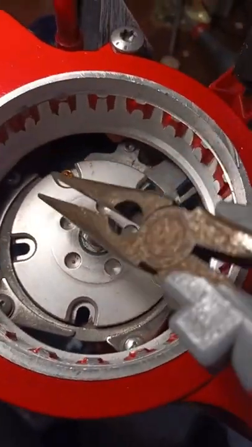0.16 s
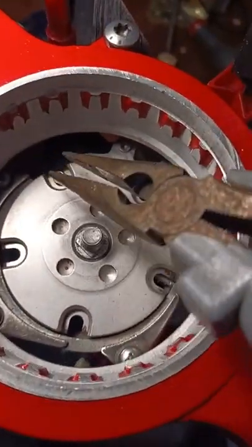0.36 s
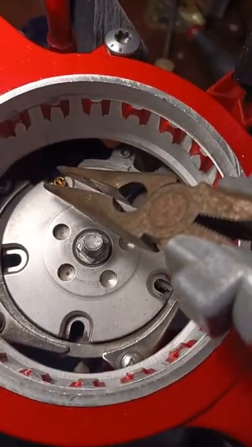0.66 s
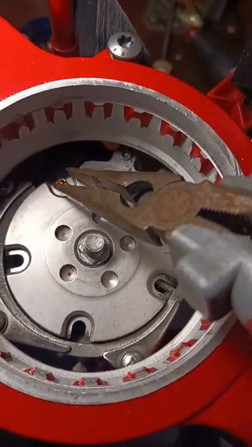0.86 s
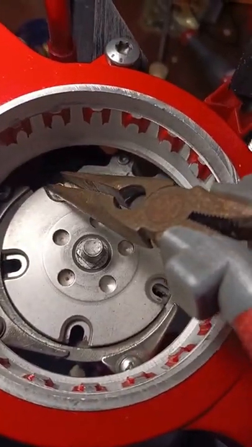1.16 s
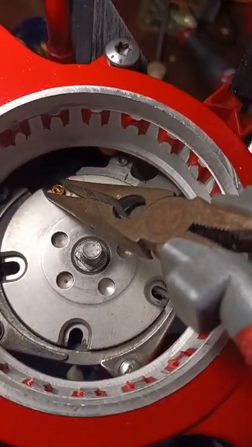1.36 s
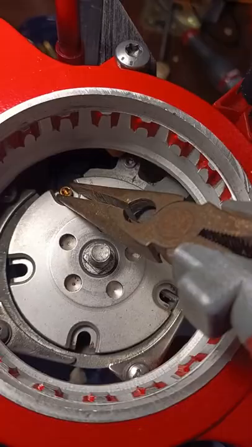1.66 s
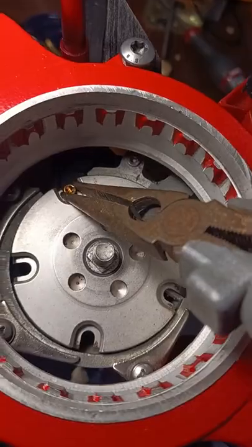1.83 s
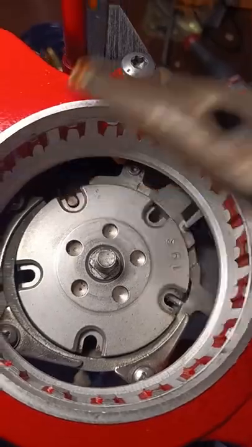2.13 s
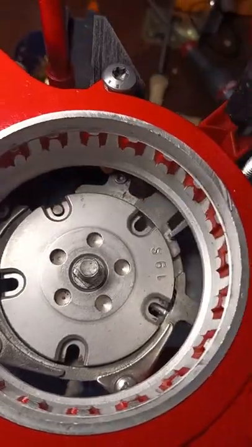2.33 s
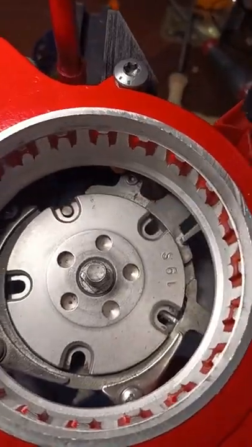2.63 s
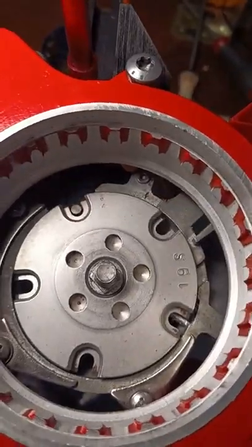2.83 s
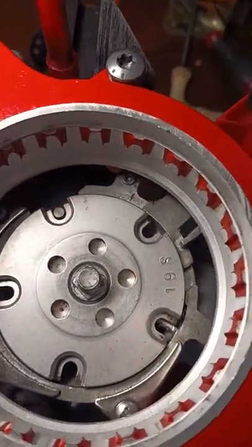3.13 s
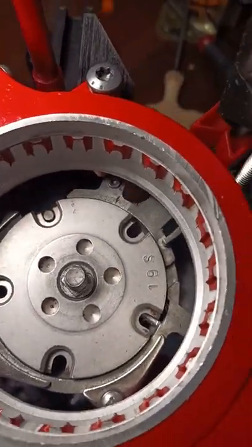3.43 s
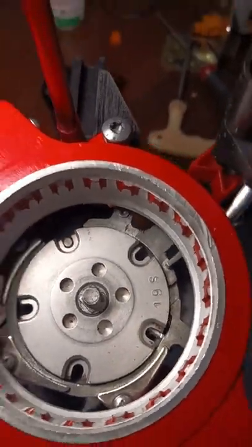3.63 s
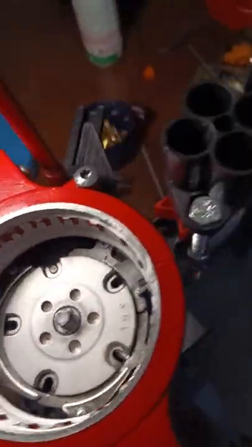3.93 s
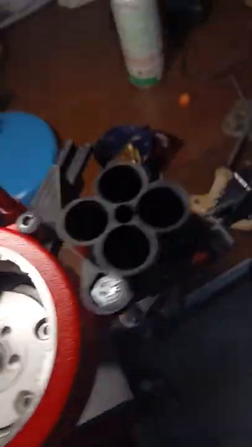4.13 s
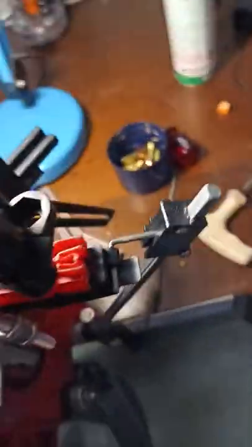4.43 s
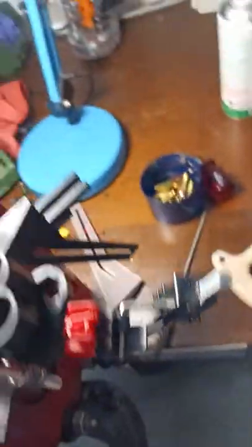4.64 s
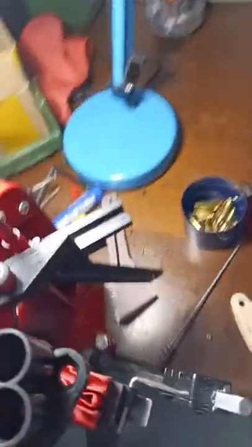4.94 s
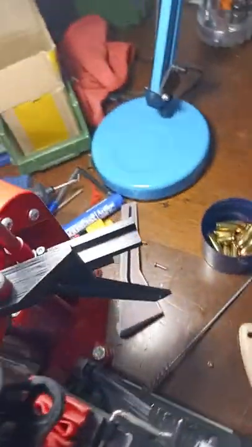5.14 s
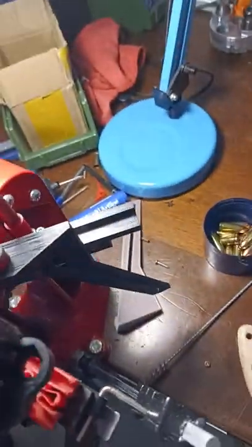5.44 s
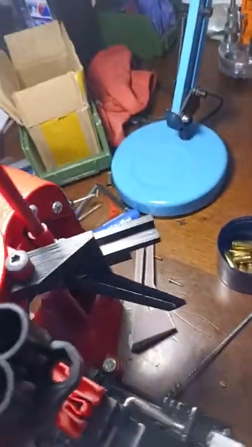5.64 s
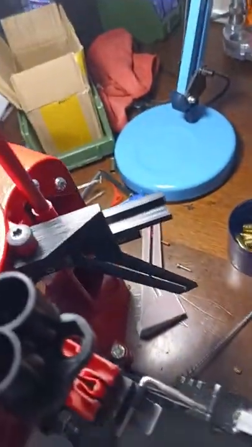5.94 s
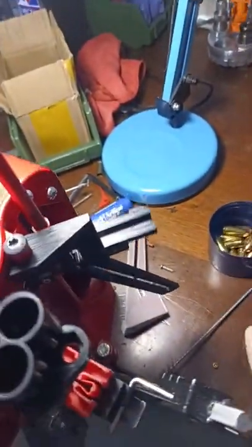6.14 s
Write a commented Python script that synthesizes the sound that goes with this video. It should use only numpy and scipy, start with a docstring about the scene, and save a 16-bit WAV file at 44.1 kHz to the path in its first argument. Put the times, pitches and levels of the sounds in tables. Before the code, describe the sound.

A quiet workshop with a faint low hush, heard close by a hand-held stereo microphone in a short, diffuse room. From 0.2 to 0.8 s plier tips graze metal in tiny, uneven ticks, mostly left, over barely audible cloth; sparse ticks continue. At 1.54 s a sharp, dry click knocks the metal plate, with a weaker one at 1.82 s. From 2.3 to 2.8 s a sleeve rubs softly and dull bumps nudge the microphone. A small clack and bright tick come at 3.06 s, crisp ticks at 3.7-3.85 s. Grainy cloth rustle swells around 4.1-4.6 s, then thins to a light sheen. A faint thud at 5.5 s precedes the loudest event at 5.83-5.89 s: a double clank with ringing steel and deep bench thud, rattling away until about 6.0 s. A spring catch chatters rapidly at 6.04 s, with duller clunks at 6.08 and 6.26 s.

```python
"""In a workshop, pliers tick and knock on the shell plate of a reloading press, close to a hand-held camera.
A sleeve brushes past as the arm withdraws and the camera swings round. Then the press is worked:
the bench thuds, the steel linkage clanks and rattles, and a spring catch chatters.
Solid parts are struck modes (decaying sines) and dense modes (decaying coloured noise);
cloth is grainy noise shaped by stroke speed and pressure, and a short diffuse room answers the impacts."""
import sys
import numpy as np
from scipy import signal
from scipy.fft import rfft, irfft, next_fast_len
from scipy.io import wavfile
from scipy.ndimage import uniform_filter1d, map_coordinates

SR = 44100
rng = np.random.default_rng(int(sys.argv[2]) if len(sys.argv) > 2 else 0)


def put_to_file(sound):
    """Save the sound as 16-bit audio at rate SR, in the file named by the first command-line argument."""
    columns = np.atleast_2d(sound).T  # one column per channel
    safe = np.clip(columns, -1, 1)
    whole_steps = np.round(safe * 32767)
    wavfile.write(sys.argv[1], SR, whole_steps.astype(np.int16))


N = 276948
AGE = np.arange(SR * 3 // 5) / SR  # time since a strike [s]

# All levels are relative; pan is left minus right.
# Blows in the press: (time [s], level [dB], clack re level [dB], steel re level [dB],
# share of the free ring time [0-1], most excited frame pitch [Hz])
PRESS_BLOWS = [(3.057, -37, -0.5, -29, 0.4, 680), (5.494, -49, -4, -27, 0.58, 780),
               (5.834, -24, -12.5, -19, 0.31, 700), (5.886, -18.5, -8.5, 2, 0.38, 690),
               (6.075, -28, -14, -27, 0.69, 780), (6.257, -28.5, -6, -24, 0.94, 760)]
# Modes of the cast frame ringing freely: (frequency [Hz], level [dB], t60 [s])
FRAME_MODES = [(550, -38.5, .2), (703.6, 2, 0.65), (763.5, 4, 0.43), (751, -8, 0.95), (926, -22.5, 0.13),
               (966.4, -10, 0.45)]
# Dense low modes of the frame: (frequency [Hz], density [dB per Hz])
CLUNK_SPECTRUM = [(150, 6), (320, -0.5), (480, -2.5), (670, 14), (950, 0), (1150, -9), (2000, -43)]
# Loose parts knocking together: (frequency [Hz], density [dB per Hz])
CLACK_SPECTRUM = [(200, -37), (390, 12), (550, -26), (860, 15.5), (1150, -3.5), (1530, 3.5), (1720, 6),
                  (1900, -6), (2150, 0.5), (2400, 2), (2900, -21), (4000, -46)]
# Modes of the steel linkage without joint friction: (frequency [Hz], level [dB], t60 [s])
LINKAGE_MODES = [(3155, -17, .22), (3391, -13, 0.33), (3830, -3, 0.39), (3830, -3, .4), (3805, -17.5, .35),
                 (3935, 30, 0.73), (3990, -17, .25), (4936, -14, .25), (5464, -54, .35), (5740, 26, 0.74),
                 (6400, 15, 0.83), (5923, -30, .35), (6700, -3, .2), (5850, 26, 0.096), (7122, -22, .3)]
# Dense upper modes of the linkage: (frequency [Hz], density [dB per Hz])
CLANG_SPECTRUM = [(2400, -18), (3100, -6), (3500, 6.5), (3950, 0), (4300, -7.5), (5200, -12.5), (5800, 3),
                  (6300, -3), (6800, -14), (7400, -9), (8300, -20), (9500, -87)]
# Runs of the spring catch: (time [s], slips [count], first gap [s], level [dB])
CATCH_RUNS_TABLE = [(5.843, 2, 0.018, -20), (6.038, 7, 0.009, -19.5)]
# One slip of the catch: (frequency [Hz], density [dB per Hz])
CATCH_SPECTRUM = [(1180, -20), (2000, -17), (3520, -11.5), (3910, -62), (4260, -5.5), (5350, -23),
                  (5730, 3), (6590, 3.5), (7380, 2), (8330, -20.5), (11100, -26.5), (12400, -44),
                  (16000, -18)]
# The bench takes the load: (time [s], level [dB])
BENCH_THUDS = [(5.381, -44), (5.495, -33.5), (5.848, -18.5), (5.939, -24.5), (6.015, -46)]
# Modes of the bench top: (frequency [Hz], level [dB], t60 [s])
BENCH_MODES = [(70, -34, 0.055), (92.8, 2, 0.29), (110.8, -8.5, 0.46), (157.5, -13, 0.35),
               (215.7, -14, 0.28), (306, -29, 0.13)]
# Things jostled on the bench: (frequency [Hz], density [dB per Hz])
JOSTLE_SPECTRUM = [(35, -14), (80, 8.5), (200, 4), (330, -4), (600, -19), (1500, -52)]
# Pliers strike the shell plate: (time [s], level [dB], knock re level [dB], click t60 [s],
# click pan [dB], strike point across the plate [0-1])
PLIER_KNOCKS = [(1.5404, -21.5, -14.5, 0.02, -4.5, 0.17), (1.6207, -41.5, -2, 0.021, 6, 0.14),
                (1.8177, -49.5, -1, 0.022, 2, 0.27), (1.823, -26, -15.5, 0.041, 2.5, 0.27),
                (1.8642, -41.5, -14.5, 0.033, 10, 0.1), (2.0138, -62, 1.5, 0.028, -7, 0.19)]
# Modes of the shell plate before the strike point weakens them: (frequency [Hz], level [dB], t60 [s])
PLATE_MODES = [(332, -7.5, 0.066), (432, -23, 0.072), (525, 1, 0.065), (674, 1.5, 0.049), (753, -1, 0.05),
               (860, -28, 0.092), (1750, -9.5, 0.029), (2036, -16, 0.053), (2970, -14.5, 0.042),
               (3530, -25, 0.039), (6370, -20.5, 0.17)]
# Click of the jaws: (frequency [Hz], density [dB per Hz])
CLICK_SPECTRUM = [(300, -19), (900, -27), (1200, -14), (1700, -6.5), (2400, -9.5), (3000, -6.5), (3700, -2),
                  (4600, -13), (6000, -0.5), (7500, -7), (9000, -24), (12000, -36), (16000, -19.5)]
# Distinct touches of plier tips and small parts: (time [s], level [dB], pitch [Hz], pan [dB])
TIP_TICKS = [(0.313, -44.5, 2980, -8.5), (0.47, -45.5, 2950, -5), (0.6785, -38.5, 6430, -11.5),
             (0.918, -40, 7160, -7), (1.1843, -44, 7500, -2), (1.3938, -41.5, 6900, -3),
             (1.7958, -48.5, 6200, -13), (2.016, -52, 2190, 7), (2.2854, -45, 6500, 9),
             (3.057, -28.5, 6230, 6), (3.7114, -27, 6970, -10), (3.732, -24.5, 2270, -5),
             (3.8466, -27.5, 5990, -1)]
# Strokes of cloth: (time at full speed [s], rise [s], hold [s], fall [s], level [dB],
# pressure [0-1], pan [dB])
CLOTH_STROKES = [(-0.01, 0.19, 0.29, 0.61, -60.5, 0.67, -6.5), (0.71, 0.15, 1, 0.85, -70.5, 0.64, -4.5),
                 (2.287, 0.2, 0.19, 0.2, -57, 1, -11), (2.512, 0.32, 0.22, 0.15, -47.5, 0.87, -11),
                 (2.969, 0.32, 0.1, 0.13, -49, 0.02, -10), (3.328, 0.43, 0.38, 0.096, -58.5, 0.02, -5.5),
                 (3.742, 0.096, 0.057, 0.057, -45.5, 0.95, -9.5),
                 (4.153, 0.24, 0.2, 0.28, -40.5, 0.93, -9.5), (4.406, 0.13, 0.098, 0.21, -37.5, 0.78, -8.5),
                 (4.714, 0.29, 0.56, 0.17, -47.5, 0.18, -3), (5.47, 0.31, 0.067, 0.19, -57.5, 0.3, -2.5),
                 (5.72, 0.14, 0.19, 0.9, -53.5, 0.42, -9), (6.16, 0.86, 0.26, 0.2, -58, 0.9, -3)]
# Sleeve dragging on the press: (frequency [Hz], density [dB per Hz])
DRAG_SPECTRUM = [(59, -30), (100, -19), (247, -1.5), (345, -7), (424, -1.5), (808, -3), (945, -7),
                 (1200, -12), (1560, -20), (2640, -120)]
# Cloth against the swinging camera: (frequency [Hz], density [dB per Hz])
GRIP_SPECTRUM = [(59, -38), (100, -12.5), (135, -16.5), (189, -3.5), (286, 0), (371, -7), (466, -1.5),
                 (533, -9), (670, -7), (1200, -14), (1560, -62), (2640, -120)]
# Grainy rub of pressed fibres: (frequency [Hz], density [dB per Hz])
RUB_SPECTRUM = [(800, -19), (1200, -1), (1700, 1.5), (2250, -8.5), (2800, -2.5), (3460, -0.5), (3850, -5),
                (4350, 1), (5000, -0.5), (6000, -1.5), (7500, -1.5), (9000, -31), (12000, -20)]
# Fine sheen of gliding fibres: (frequency [Hz], density [dB per Hz])
SHEEN_SPECTRUM = [(1800, -17.5), (3000, -21), (3800, -34), (5000, -12.5), (6000, 1.5), (6400, 0),
                  (7500, -0.5), (8400, -14), (9500, -23), (13500, -38), (14900, -13.5), (15800, -24.5)]
# Hand and sleeve bump the camera: (time [s], level [dB], pitch [Hz])
CAMERA_BUMPS = [(0.281, -41, 188), (2.282, -39, 444), (2.367, -40.5, 337), (2.573, -36, 93),
                (2.637, -29, 118), (2.748, -30, 145), (3.059, -38.5, 150), (3.359, -49.5, 286),
                (3.903, -48, 134), (4.126, -36, 280), (4.309, -41, 270)]
# The workshop at rest: (frequency [Hz], density [dB per Hz])
QUIET_SPECTRUM = [(15, -54), (25, -10.5), (120, -0.5), (206, -7), (335, -6), (503, -13.5), (2000, -19.5),
                  (2480, -19), (3720, -26), (4740, -22.5), (5430, -31.5), (7510, -25), (8140, -41.5),
                  (12200, -32), (16000, -58.5)]
# Likeness of left and right in diffuse sound: (frequency [Hz], likeness [0-1])
STEREO_LIKENESS = [(100, 0.47), (300, 0.6), (700, 0.13), (1500, 0.057), (5000, 0.0044)]
# Decay of the room: (frequency [Hz], t60 [s])
ROOM_DECAY = [(100, 0.57), (600, 0.24), (4000, 0.18), (12000, 0.1)]

FOCUS_DB_PER_OCTAVE = 38  # frame modes away from the most excited pitch stay weaker
CLUNK_DB = -5  # dull clunk re the blow, for parts pressed fully together
STEEL_DB, CLANG_DB = -20.5, -4.5  # clear ring and dense clang re the linkage's level
STEEL_T60_S = 0.42  # joint friction limits the t60 of every linkage mode to this
FLIGHT_S, RATTLE_GAP_S = 0.028, 0.0135  # hardest blow to first rebound, then between rebounds
REBOUND_DB, REBOUND_LOSS_DB = -8.5, 3  # first rebound re that blow, loss at each further one
REBOUND_CLACK_DB, REBOUND_STEEL_DB = -3, 1.5  # re the rebound's level
REBOUND_FREE = 0.53  # share of the free ring time
SLIP_SHRINK, SLIP_EDGE_DB = 0.91, 6  # each gap over the one before; weakening at a run's ends
BOOM_DB, JOSTLE_DB = -5, -10.5  # bench top and the things on it, re the thud's level
CARRIED_DB = -10.5  # clunk passed from plate to frame, re the knock
FUMBLE_START_S, FUMBLE_END_S = 0.17, 0.78  # the plier tips feel for a grip
FUMBLE_DB, FUMBLE_HZ, FUMBLE_PAN_DB = -52, 4800, -5  # centres of the grazes' level, pitch and pan
FUMBLE_OCTAVES = 0.98  # spread of their pitch
SWING_S = 3.88  # the camera starts to swing
STROKE_RANGE_DB = 20  # a stroke gains this in its rise time and loses it in its fall time
SAG_DB_PER_S = 4.5  # a held stroke slowly loses speed
DRAG_DB, DRAG_LIGHT_DB = -3.5, -18.5  # re the stroke at full pressure; change at zero pressure
RUB_DB, RUB_LIGHT_DB = 2.5, -12.5  # the same for the rub
UNEVEN_DB = 0.9  # the cloth does not slide quite evenly
SCATTER_DB, DETUNE = 2, 0.012  # spread of mode strength, and of mode pitch with the load (as a share)
QUIET_DB = -72
BASS_HZ, TOP_HZ = 42, 16100  # microphones' bass corner, upper band limit


def press():
    """Modal excitation: each blow rings the frame and linkage, and contact damping shortens the frame's ring."""
    out = np.zeros((2, N))
    linkage = [(hz, level, min(t60, STEEL_T60_S)) for hz, level, t60 in LINKAGE_MODES]
    for s, db, clack_db, steel_db, free, focus_hz in PRESS_BLOWS + rebounds(count=4):
        frame = []
        for hz, level, t60 in FRAME_MODES:
            octaves_away = abs(np.log2(hz / focus_hz))
            frame.append((hz, level - FOCUS_DB_PER_OCTAVE * octaves_away, t60 * free))
        add(out, s, amp(db - 11) * ring(frame, attack=0.00087, lead_ms=0.19))
        # parts held in contact turn the ring into a clunk
        clunk = burst(CLUNK_SPECTRUM, t60=0.29 * free, attack=0.0029)
        add(out, s, amp(db + CLUNK_DB) * (1 - free) * clunk)
        add(out, s, amp(db + clack_db - 5) * burst(CLACK_SPECTRUM, t60=0.16, attack=0.00029))
        add(out, s, amp(db + steel_db + STEEL_DB) * ring(linkage, attack=0.0021, lead_ms=0.28))
        add(out, s, amp(db + steel_db + CLANG_DB) * burst(CLANG_SPECTRUM, t60=0.21, attack=0.00034))
    return out + amp(-10.5) * room(out)


def rebounds(count):
    """Inelastic rebound: the linkage flies off its stop after the hardest blow and rattles ever more weakly."""
    s, db, *_, focus_hz = max(PRESS_BLOWS, key=lambda blow: blow[1])
    return [(s + FLIGHT_S + RATTLE_GAP_S * k, db + REBOUND_DB - REBOUND_LOSS_DB * k,
             REBOUND_CLACK_DB, REBOUND_STEEL_DB, REBOUND_FREE, focus_hz) for k in range(count)]


def catch():
    """Stick-slip: the spring catch lets go in quickening bright runs, weakest at their ends."""
    out = np.zeros((2, N))
    for s, slips, gap, db in CATCH_RUNS_TABLE:
        for k, place in enumerate(np.linspace(-1, 1, slips)):
            slip = burst(CATCH_SPECTRUM, t60=0.021, attack=0.0005)
            add(out, s, amp(db - 11 - SLIP_EDGE_DB * place ** 2) * slip)
            s += gap * SLIP_SHRINK ** k
    return panned(out + amp(-1) * room(out), pan_db=5)


def thuds():
    """Plate resonance: the bench top booms in its low modes under the press and jostles what lies on it."""
    out = np.zeros((2, N))
    modes = [amp(db) * fade(t60, attack=0.0032) * np.sin(2 * np.pi * hz * AGE)
             for hz, db, t60 in BENCH_MODES]
    boom = unit_onset(np.array([sum(modes)] * 2))
    for s, db in BENCH_THUDS:
        add(out, s, amp(db + BOOM_DB) * boom)
        add(out, s, amp(db + JOSTLE_DB) * burst(JOSTLE_SPECTRUM, t60=0.15, attack=0.003))
    return out + amp(-21.5) * room(out)


def pliers():
    """Point excitation: jaws click on the shell plate, whose damped modes depend on where it is struck."""
    out = np.zeros((2, N))
    for s, db, knock_db, t60, pan_db, point in PLIER_KNOCKS:
        # the jaw slides just before it strikes: a reversed burst swells into the click
        scrape = burst(CLICK_SPECTRUM, t60=0.017, attack=0.00026)[:, SR // 100::-1]
        add(out, s - .01, amp(db - 38) * scrape)
        click = burst(CLICK_SPECTRUM, t60, attack=0.000063)
        add(out, s, amp(db - 10.5) * panned(click, pan_db))
        # a mode struck near one of its nodes stays weak
        plate = [(hz, level - 12 * np.sin(np.pi * k * point) ** 2, life)
                 for k, (hz, level, life) in enumerate(PLATE_MODES)]
        add(out, s, amp(db + knock_db + 1) * ring(plate, attack=0.0026, lead_ms=0.26))
        carried = burst(CLUNK_SPECTRUM, t60=0.12, attack=0.002)
        add(out, s, amp(db + knock_db + CARRIED_DB) * carried)
    return out + amp(-9) * room(out)


def ticks():
    """Brief contact: each light touch is a snap of a few cycles with a bright crack."""
    out = np.zeros((2, N))
    crack_spectrum = [(500, 5.5), (3000, -2), (8000, 14), (10000, -47), (16000, 7)]  # (Hz, dB per Hz)
    for s, db, hz, pan_db in TIP_TICKS + list(grazes(count=8)):
        cycles = hz * AGE
        phase = rng.random((2, 1))
        snap = unit_onset(amp(-4 * cycles) * cycles ** 2 * np.sin(2 * np.pi * (cycles + phase)))
        crack = burst(crack_spectrum, t60=0.0051, attack=0.00034)
        add(out, s, amp(db - 16) * panned(snap + amp(1) * crack, pan_db))
    return out + amp(-14) * room(out)


def grazes(count):
    """Random contact: faint touches at uneven times while the pliers feel for a grip."""
    slot = (FUMBLE_END_S - FUMBLE_START_S) / count
    for k, (when, size, pitch, side) in enumerate(rng.uniform(-0.84, 1, (count, 4))):
        s = FUMBLE_START_S + slot * (k + .5 + .5 * when)
        hz = FUMBLE_HZ * 2 ** (FUMBLE_OCTAVES * pitch)
        yield s, FUMBLE_DB + 3 * size, hz, FUMBLE_PAN_DB + 6 * side


def sleeve():
    """Fibre friction: pressure adds a lumpy drag and grainy rub to the fine sheen of gliding cloth."""
    t = np.arange(N) / SR
    fibres = amp(1.93 * rng.standard_normal(N) + 0.89 * wobble(250))  # fibres catch and let go
    on_press = noise(DRAG_SPECTRUM, N, fibres, lead_ms=-0.23)
    on_camera = noise(GRIP_SPECTRUM, N, fibres, lead_ms=-0.86)
    contact = np.where(t < SWING_S, on_press, on_camera)
    drag = amp(DRAG_DB + 2.1 * wobble(40)) * patchy(contact, depth_db=3)
    rub_noise = noise(RUB_SPECTRUM, N, fibres, lead_ms=-0.481)
    rub = amp(RUB_DB + UNEVEN_DB * wobble(45)) * patchy(rub_noise, depth_db=3)
    sheen_noise = noise(SHEEN_SPECTRUM, N, fibres)
    sheen = amp(1.5 + UNEVEN_DB * wobble(25)) * patchy(sheen_noise, depth_db=2)
    return drag * strokes(DRAG_LIGHT_DB) + rub * strokes(RUB_LIGHT_DB) + sheen * strokes(0)


def strokes(light_db):
    """Sliding speed and load: stereo gain of strokes that rise, hold and fall, changed by light_db at no load."""
    t, power = np.arange(N) / SR, np.zeros((2, N))
    for s, rise, hold, fall, db, pressure, pan_db in CLOTH_STROKES:
        away = np.maximum(s - t, 0) / rise + np.maximum(t - s - hold, 0) / fall
        level_db = db - STROKE_RANGE_DB * away - SAG_DB_PER_S * np.clip(t - s, 0, hold)
        power += panned(amp(level_db + light_db * (1 - pressure)), pan_db) ** 2
    return np.sqrt(power)


def patchy(x, depth_db):
    """Spectral modulation: small patches of time and frequency vary in level as folds form and flatten."""
    z = signal.stft(x, nperseg=1024)[2]
    field = rng.standard_normal(z.shape[1:])
    field = uniform_filter1d(field, size=5, axis=0)  # smooth over frequency
    field = uniform_filter1d(field, size=7, axis=1)  # smooth over time
    return unit(signal.istft(z * amp(depth_db * unit(field)))[1][:, :N])


def bumps():
    """Structure-borne impact: hand and sleeve nudge the camera body, a damped band around one pitch."""
    out = np.zeros((2, N))
    for s, db, hz in CAMERA_BUMPS:
        colour = [(hz / 4, -18), (hz / 2, -7), (hz, 0), (hz * 1.18, -6), (hz * 3, -24), (hz * 8, -55)]
        add(out, s, amp(db - 8.5) * burst(colour, t60=0.097, attack=0.0016))
    return out + amp(-21.5) * room(out)


def room(x):
    """Diffuse reverberation: convolution with noise whose bass outlasts its treble."""
    hz, t, z = signal.stft(noise([(SR / 2, 0)], SR // 2), SR, nperseg=256)
    decay = amp(-60 * t / along(ROOM_DECAY, hz)[:, None])
    tail = signal.istft(z * decay, SR, nperseg=256)[1]
    return signal.fftconvolve(x, tail / np.linalg.norm(tail[0]), axes=1)[:, :N]


def quiet():
    """Stationary background noise: the steady coloured hush of the workshop at rest."""
    return amp(QUIET_DB) * noise(QUIET_SPECTRUM, N)


def ring(modes, attack, lead_ms):
    """Modal superposition: detuned decaying sines of random strength and phase, the left leading by lead_ms."""
    t = AGE + np.array([[.5], [-.5]]) * lead_ms / 1000
    total = 0
    for hz, db, t60 in modes:
        size, shift = rng.standard_normal(2)
        phase = rng.random()  # in turns (fractions of a cycle)
        sine = np.sin(2 * np.pi * (hz * (1 + DETUNE * shift) * t) + 2 * np.pi * phase)
        total = total + amp(db + SCATTER_DB * size) * fade(t60, attack) * sine
    return unit_onset(total)


def burst(spectrum, t60, attack):
    """High modal density: many close modes dying together act as decaying coloured noise."""
    return unit_onset(noise(spectrum, len(AGE)) * fade(t60, attack))


def fade(t60, attack):
    """Exponential damping: quick rise, then a decay of 60 dB in t60 seconds."""
    return amp(-60 * AGE / t60) * (1 - np.exp(-AGE / attack))


def noise(spectrum, size, grain=1, lead_ms=0):
    """Interchannel coherence: coloured stereo noise of rms 1; grain weights each sample of the excitation."""
    m = next_fast_len(size + 4096)
    hz = np.fft.rfftfreq(m, 1 / SR)
    turn = np.arccos(np.clip(along(STEREO_LIKENESS, hz), -1, 1)) / 2
    white = rfft(rng.standard_normal((2, size)) * grain, m)
    mid, side = white * amp(along(spectrum, hz)) * [np.cos(turn), np.sin(turn)]
    lead = np.exp(1j * np.pi * hz * lead_ms / 1000)  # half the lead on each side; negative favours the right
    return unit(irfft([(mid + side) * lead, (mid - side) / lead], m)[:, :size])


def wobble(rate):
    """Slow random modulation: a smooth curve through rate random knots a second."""
    knots = rng.standard_normal(int(N * rate / SR) + 4)
    return map_coordinates(knots, [np.arange(N) * rate / SR])


def along(points, hz):
    """Logarithmic frequency scale: read (Hz, value) points between their knots."""
    f, v = np.transpose(points)
    return np.interp(np.log(hz + 1), np.log(f + 1), v)


def amp(db):
    """Level law: decibels to amplitude gain."""
    return 10 ** (np.asarray(db) / 20)


def unit(x):
    """Mean power: scale to rms 1."""
    return x / np.sqrt(np.mean(x ** 2) + 1e-20)


def unit_onset(x):
    """Onset power: scale a hit to rms 1 over its first hundredth of a second."""
    return x / np.sqrt(np.mean(x[:, :SR // 100] ** 2) + 1e-20)


def panned(x, pan_db):
    """Interaural level difference: tip a sound to the left by pan_db."""
    return x * amp(np.array([[.5], [-.5]]) * pan_db)


def add(track, s, sound):
    """Linear superposition: mix a sound into the track at time s."""
    part = track[:, round(s * SR):][:, :sound.shape[1]]
    part += sound[:, :part.shape[1]]


def scene():
    """Superposition of all sources over the quiet of the workshop."""
    return press() + catch() + thuds() + pliers() + ticks() + sleeve() + bumps() + quiet()


def record(dry):
    """Band limitation: the camera rolls off the deep bass and keeps nothing above its band limit."""
    m = next_fast_len(N + SR // 2)
    hz = np.fft.rfftfreq(m, 1 / SR)
    bass_cut = (1j * hz / (1j * hz + BASS_HZ)) ** 2
    return irfft(rfft(dry, m) * bass_cut * (hz < TOP_HZ), m)[:, :N]


dry = scene()
out = record(dry)
put_to_file(out)
```